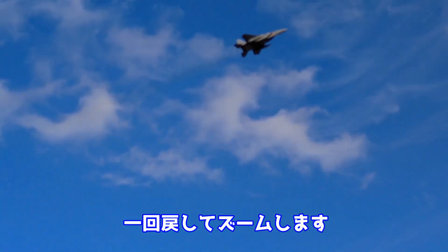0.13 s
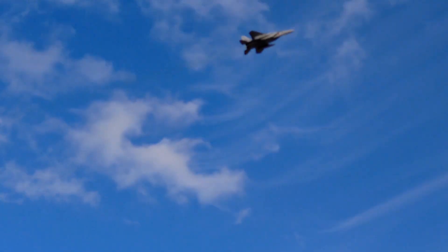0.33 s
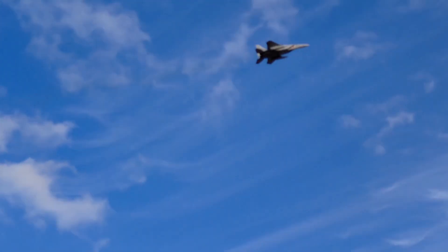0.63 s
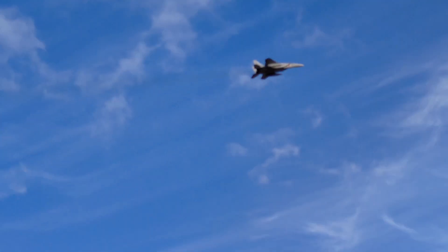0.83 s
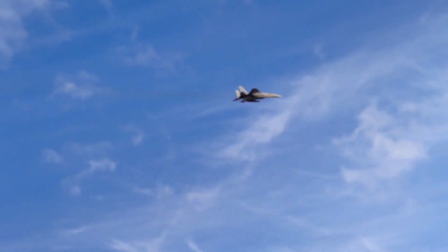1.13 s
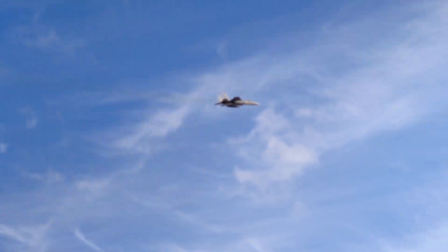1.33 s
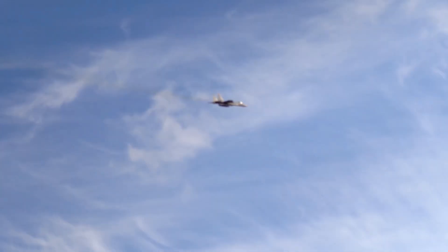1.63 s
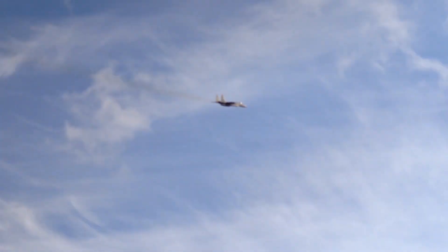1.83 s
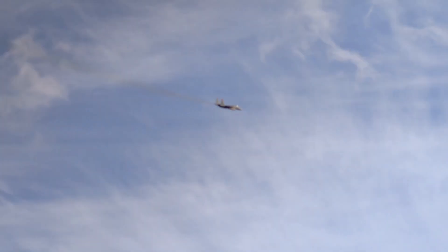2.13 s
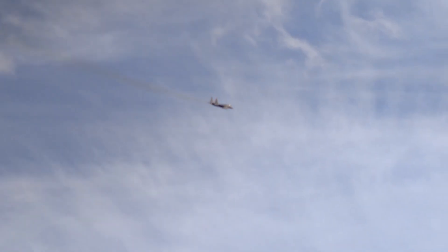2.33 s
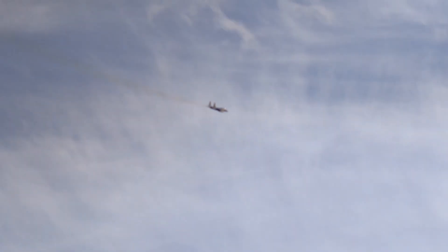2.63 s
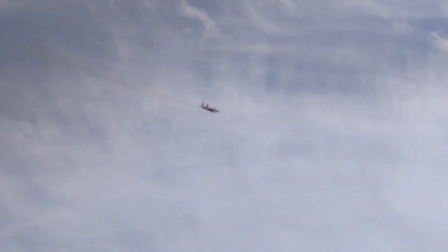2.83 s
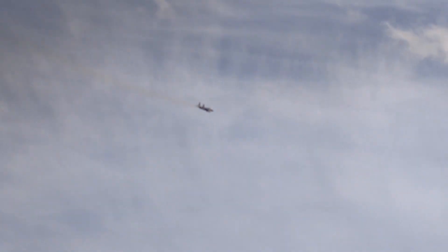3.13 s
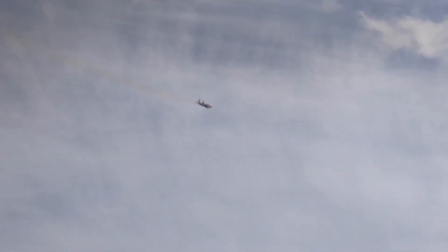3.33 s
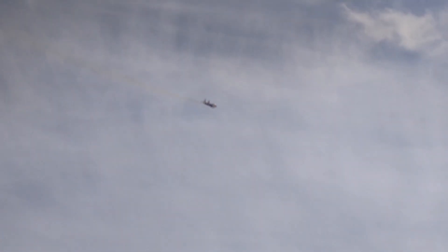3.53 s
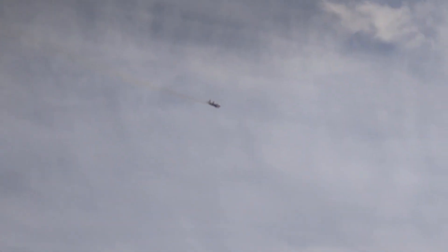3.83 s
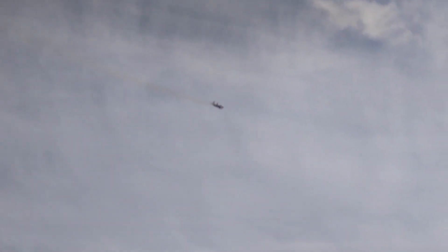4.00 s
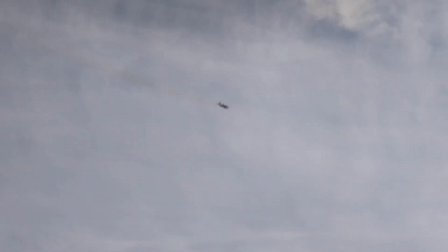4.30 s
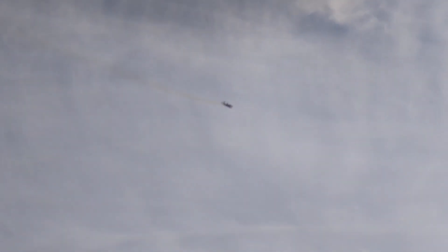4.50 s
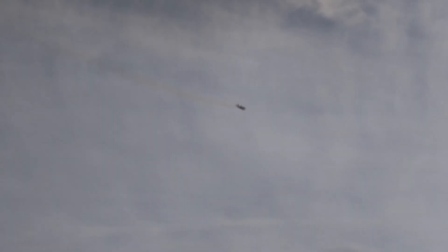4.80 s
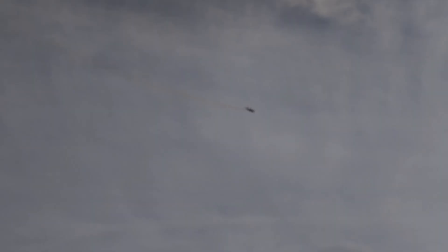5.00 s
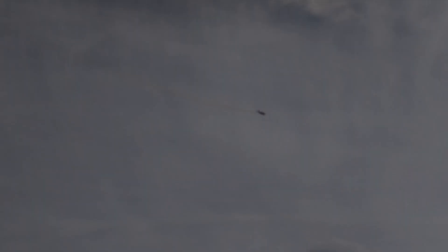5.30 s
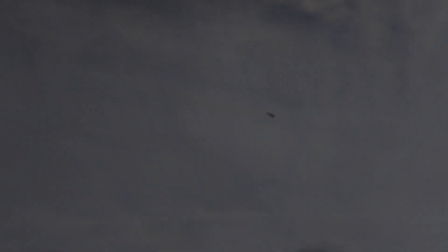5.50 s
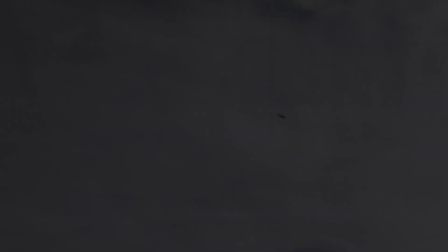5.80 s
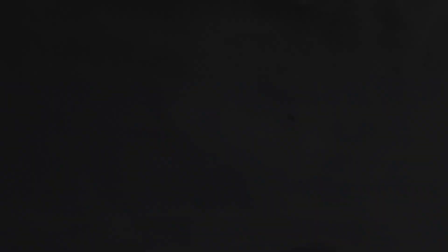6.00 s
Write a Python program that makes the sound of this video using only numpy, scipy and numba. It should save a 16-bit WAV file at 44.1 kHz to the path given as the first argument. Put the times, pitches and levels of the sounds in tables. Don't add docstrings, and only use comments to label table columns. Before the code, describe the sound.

A military jet tears past overhead with a rough, crackling howl that peaks early, then recedes into deep, fluttering rumble as it climbs away.

```python
import sys
import numpy as np
from scipy import signal
from scipy.fft import rfft, irfft, next_fast_len
from scipy.io import wavfile
from scipy.ndimage import uniform_filter1d, map_coordinates
from numba import njit

SR = 44100
rng = np.random.default_rng(int(sys.argv[2]) if len(sys.argv) > 2 else 0)


def convert_level_to_amplitude(level_db):
    exponent = np.asarray(level_db, float) / 20
    return 10 ** exponent


def materialize(psi):
    bounded = np.clip(np.atleast_2d(psi).T, -1, 1)
    quanta = np.round(bounded * 32767).astype(np.int16)
    wavfile.write(sys.argv[1], SR, quanta)


N = 271215


def noise():
    return rng.standard_normal(N)


def unit(x):
    return x / np.sqrt(np.mean(x ** 2))


def curves(table):
    s, *columns = np.transpose(table)
    return [np.interp(np.arange(N) / SR, s, c) for c in columns]


def bumps(table):
    t = np.arange(N) / SR
    return sum(db * np.exp(-((t - s) / half) ** 2) for s, db, half in table)


def colour(x, hz, db):
    size = next_fast_len(N)
    f = np.maximum(np.arange(size // 2 + 1) * SR / size, 1)
    gain = convert_level_to_amplitude(np.interp(np.log(f), np.log(hz), db, left=-90, right=-90))
    return irfft(rfft(x, size) * gain, size)[:N]


def band_noise(table):
    return unit(colour(noise(), *np.transpose(table)))


def delay(x, ms):
    return map_coordinates(x, [np.arange(N) - ms * SR / 1000], order=3, mode="nearest")


def walk(rate):
    k = int(SR / rate)
    steps = np.repeat(rng.standard_normal(N // k + 1), k)
    return unit(uniform_filter1d(uniform_filter1d(steps, k), k)[:N])


def ports(make, apart, lead_ms):
    shared, apart = make(), np.clip(apart, 0, 1)
    pair = [np.sqrt(1 - apart) * shared + np.sqrt(apart) * make() for _ in range(2)]
    return np.array([delay(pair[0], -lead_ms / 2), delay(pair[1], lead_ms / 2)])


def lift(pair, hz, kind, db):
    part = signal.sosfiltfilt(signal.butter(2, hz, kind, fs=SR, output="sos"), pair)
    return pair + (convert_level_to_amplitude(db) - 1) * part


def turbulence(pair, patchy_db=2.0):
    z = signal.stft(pair, nperseg=2048)[2]
    field = rng.standard_normal(z.shape[1:])
    field = uniform_filter1d(uniform_filter1d(field, size=3, axis=0), size=3, axis=1)
    gain = convert_level_to_amplitude(patchy_db * np.clip(unit(field), -2, 2))
    return signal.istft(z * unit(gain), nperseg=2048)[1][:, :N]


@njit
def svf(x, hz, width):
    y, b, l = np.empty(len(x)), 0., 0.
    for i in range(len(x)):
        g, k = np.tan(np.pi * hz[i] / SR), width[i] / hz[i]
        v = (b + g * (x[i] - l)) / (1 + g * (g + k))
        b, l, y[i] = 2 * v - b, l + 2 * g * v, k * v
    return y


def howl(hz, wide):
    air = noise()
    core = svf(svf(air, hz, wide), hz, wide)
    skirt_hz, skirt_wide = 1.3 * hz, 1.8 * wide
    skirt = svf(svf(air, skirt_hz, skirt_wide), skirt_hz, skirt_wide)
    return (core + convert_level_to_amplitude(-14.5) * skirt) / np.sqrt(wide / SR * np.pi / 2)


def roar(howl_hz, width_hz, lead_ms, level_db):
    # frequency in Hz, level in dB per Hz.
    broad = [(230, -19), (330, -6.5), (450, -3), (600, -1.5), (800, -16.5)]
    hz = howl_hz * (1 + .04 * walk(12))
    broad_db = -6 + 8.5 * np.log2(width_hz / 400)
    pair = ports(lambda: howl(hz, 0.99 * width_hz), 0.013, lead_ms)
    pair += convert_level_to_amplitude(broad_db) * ports(lambda: band_noise(broad), 0.037, lead_ms)
    return pair * convert_level_to_amplitude(level_db + np.array([[-.3], [.8]]))


def rumble(lead_ms, behind, km, gust_db):
    # frequency in Hz, level in dB per Hz.
    deep = [(18, -15.5), (30, -29.5), (60, -10.5), (95, -4), (132, 0.5), (170, -2), (250, -4.5), (330, -9),
            (450, -11.5), (620, -22.5)]
    # frequency in Hz, level in dB per Hz.
    ground = [(90, -24), (120, -6), (138, -3.5), (165, -10), (210, -22.5)]
    # centre in seconds, level in dB, half length in seconds.
    rolls = [(0.13, 1, 0.045), (0.509, -4.5, 0.02), (0.718, -2, 0.22), (1.038, -2, 0.27), (1.327, 0, 0.04),
             (1.576, -1, 0.087), (1.856, 1, 0.044), (1.956, -2.5, 0.026), (2.534, 1, 0.079),
             (2.873, 2.5, 0.02), (3.283, -0.5, 0.055), (3.402, -2.5, 0.099), (3.532, 5, 0.035),
             (3.712, 0.5, 0.043), (4.081, -5, 0.075), (4.23, -0.5, 0.035), (3.17, 1.8, 0.08),
             (2.68, -1.5, 0.091), (5.85, 0.5, 0.049), (0.82, -1, 0.05), (2.25, 1.5, 0.14),
             (4.749, -1.5, 0.062), (5.358, 5.5, 0.052), (5.687, 2.5, 0.14), (5.986, 7.5, 0.12)]
    # centre in seconds, level in dB, half length in seconds.
    ground_swings = [
        (2.6, -3, 0.36),
        (3.2, -3.5, .2),
        (3.6, 0.5, .1),
        (4.2, 2, .08),
        (4.6, -1, 0.18),
        (5.0, 2, .1),
        (5.4, 2, 0.11),
        (5.75, 0.5, .12),
        (6.0, -1, .1),
    ]
    pair = ports(lambda: band_noise(deep), 0.0087, lead_ms)
    pair = lift(pair, 69, "low", -2.5 + 4 * behind + gust_db)
    pair = lift(pair, 200, "high", 6 - 7 * km)
    boom_db = -19 + 12.5 * km + bumps(ground_swings)
    pair += convert_level_to_amplitude(boom_db) * band_noise(ground)
    return pair * convert_level_to_amplitude(-38 + 24 * behind + 0.98 * bumps(rolls))


def rasp(lead_ms, level_db):
    # frequency in Hz, level in dB per Hz.
    small_eddies = [(500, -8), (800, -1.5), (1050, 2), (1350, 4), (1500, -3.5), (1700, -8), (2000, -11),
                    (2300, -53)]
    pair = ports(lambda: band_noise(small_eddies), 0.047, 1.34 * lead_ms)
    return pair * convert_level_to_amplitude(level_db + np.array([[.1], [2.5]]))


def steepen(low):
    bend = 0.22 * np.tanh(2 * low) ** 2
    return low + signal.sosfiltfilt(signal.butter(3, [40, 1500], "band", fs=SR, output="sos"), bend)


def scatter(pair, share, tail_ms):
    keep = np.exp(-1000 / (tail_ms * SR))
    tail = signal.lfilter([0, share * np.sqrt(1 - keep ** 2)], [1, -keep], np.abs(pair))
    return pair + tail * rng.standard_normal(pair.shape)


def lone_fronts(lead_ms):
    # arrival in seconds, peak in dB.
    single_fronts = [(0.0337, -29), (0.1261, -8.5), (0.2042, -18), (0.2302, -17.5), (0.291, -15),
                     (0.3646, -19), (0.382, -16.5), (0.4032, -21), (0.453, -14.5), (0.4786, -7.5),
                     (0.5651, -24), (0.5975, -15.5), (0.615, -3.5), (0.6673, -12), (0.7213, -14),
                     (0.7996, -10.5), (1.0001, -20.5), (1.0535, -11.5), (1.1388, -9), (1.2472, -19.5),
                     (1.258, -13), (1.3296, -8.5), (1.4635, -10.5), (1.497, -7.5), (1.5363, -15.5),
                     (1.5542, -3), (1.6802, -17.5), (1.6818, -4.5), (1.8137, -18.5), (2.01, -22.5),
                     (2.1358, -16.5), (2.2513, -12.5), (2.4727, -22), (2.5112, -27), (2.6957, -16.5),
                     (2.947, -26), (3.105, -25.5), (3.149, -22.5), (3.188, -26.5), (3.2, -34.5),
                     (3.2018, -13), (3.26, -27), (3.3282, -25), (3.3852, -12), (3.471, -24.5),
                     (3.7632, -29.5), (3.7745, -27.5), (3.818, -25), (3.8506, -11.5), (3.8761, -21.5),
                     (3.8968, -27), (3.9623, -22), (4.0163, -18), (4.0405, -17.5), (4.2348, -34),
                     (4.4383, -21.5), (4.813, -24), (4.984, -25), (5.0825, -28.5), (5.2455, -43)]
    # arrival in seconds, peak in dB.
    further_fronts = [(0.4035, -19.5), (0.502, -12), (0.8114, -16), (0.9224, -16), (1.0727, -12.5),
                      (1.5694, -17), (1.9347, -16.5), (1.9662, -6.5), (2.0292, -6.5), (2.0348, -9.5),
                      (2.0901, -13), (2.2634, -11), (2.2744, -12), (2.2894, -25.5), (2.3394, -15.5),
                      (2.351, -14), (2.3692, -15.5), (2.3812, -15.5), (2.4144, -15.5), (2.4714, -23),
                      (2.5348, -26.5), (2.6586, -24.5), (2.9051, -16.5), (3.701, -30), (3.9294, -21.5),
                      (4.0556, -29.5), (4.0654, -22), (4.0757, -30.5), (4.1869, -39), (4.2822, -30),
                      (4.3705, -39), (4.3986, -27.5), (4.4144, -31.5), (4.4257, -24), (4.625, -31.5),
                      (4.7704, -35), (4.8906, -33.5), (5.018, -33.5), (5.0228, -25), (5.3438, -36),
                      (5.519, -30), (5.5677, -34.5), (5.618, -37), (5.8616, -38.5), (6.0033, -41)]
    lone = np.zeros(N)
    s, peak_db = np.transpose(list(single_fronts) + list(further_fronts))
    lone[((s + .001) * SR).astype(int)] = convert_level_to_amplitude(peak_db + 11.0)
    return lift(scatter(ports(lambda: lone, 0, lead_ms), 0.32, 3.5), 3900, "low", -6.0)


def approach_colour(pair):
    # frequency in Hz, left level in dB, right level in dB.
    coming_on = [(1000, 2.5, -0.5), (2180, 0.5, 1), (3100, 7.5, -3), (3930, -4.5, 0.5), (4800, -7, -2.5),
                 (5540, -2.5, -4.5), (6460, 3, 8), (7200, -1.5, -2), (9400, 2.5, -4)]
    ahead = np.clip(3.6 * (1 - np.arange(N) / SR / 1.1), 0, 1)
    hz, *dbs = np.transpose(coming_on)
    return (1 - ahead) * pair + ahead * np.array([colour(pair[c], hz, dbs[c]) for c in range(2)])


def port_colour(pair, behind):
    # frequency in Hz, left and right level in dB with the jet abeam,
    # left and right level in dB with the jet going away.
    response = [(1632, -2.5, -13, -1.5, -43), (2296, -2, 1.5, 9, -26.5), (2720, -7, -7.5, -0.5, 4.5),
                (3280, -10.5, 5.5, 3.5, 9.5), (3774, 0, 3, 7, -0.5), (4050, -1.5, -2.5, 1, -15),
                (5190, 6, 1, -1, -2), (5400, 1.5, 6, -6.5, -2.5), (6640, 1, -5.5, -4, -1.5),
                (6890, 5, -2, -1, -12), (7405, -16, 0, -8.5, -34.5), (7980, -15.5, -17.5, -29.5, -31),
                (8300, -38, -38.5, -40, -41), (8450, -15, -17.5, -21.5, -23.5)]
    hz, *dbs = np.transpose(response)
    hz = np.r_[1250, hz, 9080]
    dbs = [np.r_[db[0] - 18.0, db, db[-1] - 9.0] + 6.5 for db in dbs]
    abeam = np.array([colour(pair[c], hz, dbs[c]) for c in range(2)])
    away = np.array([colour(pair[c], hz, dbs[2 + c]) for c in range(2)])
    return (1 - behind) * abeam + behind * away


def crackle(wave, lead_ms, turn, behind, flutter_db, level_db, bright_db, sharp_db):
    # centre in seconds, level in dB, half length in seconds.
    dulled = [(.1, -1.5, 0.064), (.42, 0, .05), (.62, 0.5, .04), (1.0, 0, .1), (2.3, -0.5, 0.068),
              (2.6, 0, .1), (3.0, 0.5, .1), (3.3, 1.5, .08), (3.85, -3, .08), (4.05, -1, .04),
              (4.16, 2, .04), (4.26, 5.5, .05), (4.38, 4.5, .03), (4.5, 0.5, .05), (4.75, 1, .08),
              (5.05, 5, .06), (5.3, 2, .08), (5.6, -0.5, .06), (5.85, -3, .1), (6.05, -0.5, .05)]
    wave = wave / np.sqrt(uniform_filter1d(wave ** 2, size=4096))
    crest = convert_level_to_amplitude(4.7 * np.clip(delay(wave, -0.26), -3, 2.4) + walk(45) + flutter_db)
    fronts = rng.random(N) < 1100 / SR
    fronts = fronts * convert_level_to_amplitude(np.minimum(3.6 * rng.exponential(size=N), 13))
    dense = convert_level_to_amplitude(-5.0) * noise() + convert_level_to_amplitude(-6.5 + 0.5 * sharp_db) * unit(fronts - fronts.mean())
    pair = ports(noise, 0.88, 0) * convert_level_to_amplitude(-7.5) + ports(lambda: dense, 0, lead_ms)
    pair = turbulence(pair * unit(crest) * convert_level_to_amplitude(level_db + 4.0), patchy_db=3.0)
    pair = approach_colour(pair + lone_fronts(lead_ms))
    pair = lift(pair, 3900, "low", bumps(dulled))
    pair = lift(pair, 6800, "high", bright_db)
    pair[1] = np.real(signal.hilbert(pair[1], next_fast_len(N))[:N] * np.exp(1j * turn))
    return port_colour(pair, behind)


def wind(gust_db):
    # frequency in Hz, level in dB per Hz.
    buffeting = [(12, -3.5), (25, -15.5), (40, 15.5), (70, -35)]
    return convert_level_to_amplitude(-55.0 + gust_db) * np.array([band_noise(buffeting) for _ in range(2)])


def gulps(usual_db):
    # jump in seconds, peak in dB.
    sudden = [(0.326, -11), (0.367, -8), (0.388, -9.5), (0.579, 0), (0.637, -13), (0.714, -11.5),
              (0.843, -4), (0.999, -12.5), (1.05, -9), (1.201, -10.5), (1.697, -13.5), (2.268, -12),
              (2.504, -7), (2.824, -15.5), (2.855, -16.5), (2.984, -11.5), (3.184, -16), (3.444, -18),
              (3.508, -12.5), (3.526, -18.5), (3.558, -19.5), (3.576, -14.5), (3.61, -15), (3.631, -14),
              (3.699, -11.5), (3.877, -11), (3.912, -11), (3.931, -13.5), (4.016, -12), (4.049, -16),
              (4.099, -11.5), (4.15, -14.5), (4.234, -9), (4.362, -9), (4.543, -6.5), (4.571, -8.5),
              (4.71, -17.5), (4.736, -15.5), (4.873, -6.5), (4.908, -12.5), (5.007, -10.5), (5.336, -8.5),
              (5.472, -10), (5.518, -12), (5.906, -15.5)]
    t = np.arange(N) / SR
    out = np.zeros(N)
    for s, peak_db in sudden:
        a, i, b = max(int((s - .05) * SR), 0), int(s * SR), int((s + .1) * SR)
        out[a:i] += -7 * np.exp((t[a:i] - s) / 0.0045)
        out[i:b] += (peak_db - 8.5 - usual_db[i]) * np.exp((s - t[i:b]) / 0.016)
    return uniform_filter1d(out, size=64)


def focusing():
    # centre in seconds, level in dB, half length in seconds.
    surges = [(0.05, -3, 0.033), (0.344, -3, 0.022), (0.351, -10, 0.0045), (0.505, 1.5, 0.0065),
              (0.454, 3.5, 0.074), (0.544, -5, 0.015), (0.619, 4, 0.022), (0.703, -4.5, 0.055),
              (0.973, -3.5, 0.015), (1.187, -6.5, 0.034), (1.442, 4, 0.14), (1.691, 6.5, 0.024),
              (1.926, 3, 0.084), (2.295, 1.5, 0.07), (2.434, -7, 0.027), (2.624, -9, 0.028),
              (2.704, 5, 0.018), (2.764, -4.5, 0.03), (3.28, 1, 0.036), (5.17, -1, 0.03), (2.948, 5, 0.055),
              (3.043, -2, 0.045), (3.208, 10, 0.024), (3.342, 8, 0.036), (3.557, -4, 0.14),
              (3.961, 7.5, 0.16), (4.141, -5.5, 0.037), (4.34, -1.5, 0.012), (5.054, 4, 0.041),
              (5.193, -6.5, 0.059), (5.562, 8.5, 0.064), (5.722, -3, 0.032), (5.981, 4.5, 0.031),
              (6.101, -22, 0.051)]
    # centre in seconds, level in dB.
    volleys = [(0.138, 4), (0.238, 4.5), (0.388, 2), (0.482, 0), (0.41, 4), (0.455, 3.5), (0.598, 6),
               (0.627, 3.5), (0.725, -1), (0.812, 7), (2.26, 0.5), (2.7, 1.5), (4.06, 3.5), (4.078, 4),
               (4.4, -1), (5.02, 4), (5.045, 2.5), (0.923, 6.5), (1.003, 0.5), (1.074, 0.5), (1.142, 2.5),
               (1.255, 4.5), (1.503, 6), (1.556, 8.5), (1.865, 5.5), (2.037, 5.5), (2.36, 6), (3.119, 8),
               (3.392, 2), (3.478, -0.5), (3.582, 6), (3.776, 7), (3.821, 3.5), (3.85, 1.5), (4.038, 5),
               (4.294, 5.5), (4.435, 5.5), (4.571, 2), (4.624, 7), (5.087, 9.5), (5.249, 7.5),
               (5.872, 11.5)]
    return bumps(surges) + bumps([(s, db, 0.011) for s, db in volleys])


def scene():
    # time in seconds, howl frequency in Hz, howl width in Hz, howl level in dB,
    # share seen from behind from 0 to 1, air path in km.
    flight = [(0, 453, 179, -18, 0.32, 0.49), (.15, 453, 215.6, -20.5, 0.19, 0.53),
              (.6, 534, 187, -18, 0.14, 0.42), (1, 611, 219, -21, 0.14, 0.43),
              (1.3, 672, 345, -20.5, 0.44, 0.24), (1.55, 813, 445, -19.5, 0.26, 0.39),
              (1.8, 836, 745, -26, 0.45, 0.19), (2.1, 678, 616, -27, 0.53, 0.27),
              (2.4, 520, 578, -24.5, 0.68, 0.41), (2.8, 512, 470, -24, 0.79, 0.62),
              (3.2, 490, 428, -22, 0.88, 0.9), (3.6, 456, 395, -23, 0.89, 0.89),
              (3.95, 482, 404, -19, 0.94, 1.27), (4.3, 479, 392, -20.5, 0.92, 1.18),
              (4.8, 463, 401, -21.5, 0.76, 1.22), (5.3, 473, 426, -21.5, 0.98, 1.28),
              (5.7, 474, 423, -26, 0.98, 1.46), (6.15, 525, 406, -30, 0.74, 1.34)]
    # time in seconds, left lead of the roar in ms, left lead of the crackle in ms,
    # phase turn of the crackle round the housing in radians.
    bearing = [
        (0, 0.22, 0.56, 8),
        (.6, 0.28, 0.43, 4.5),
        (1.2, 0.29, 0.39, 13),
        (1.75, 0.21, 0.23, 6.5),
        (2.2, 0.17, -0.067, -1),
        (2.75, 0.19, -0.016, 1),
        (3.5, 0.16, -0.16, -1.5),
        (4.5, 0.082, -0.15, -0.5),
        (6.15, 0.077, -0.1, 0),
    ]
    # centre in seconds, level in dB, half length in seconds.
    swells = [(0.14, 3, 0.068), (0.35, -13, 0.004), (0.399, 6.5, 0.019), (0.539, -4.5, 0.015),
              (0.698, -4, 0.042), (0.848, 3, 0.05), (0.978, -4.5, 0.019), (1.157, -3.5, 0.089),
              (1.377, 1, 0.12), (1.47, -1.5, 0.06), (1.626, -5, 0.11), (1.836, 2.5, 0.024),
              (2.015, 0, 0.07), (2.19, 0.4, 0.041), (2.315, 3, 0.057), (2.46, 0, 0.03), (0.5, -0.5, 0.029),
              (2.794, -4.5, 0.022), (3.273, -4, 0.027), (3.422, -4.5, 0.034), (3.662, 2, 0.038),
              (3.821, -5, 0.06), (3.921, -2.5, 0.04), (4.111, -7.5, 0.067), (4.33, -7, 0.019),
              (4.44, 1.5, 0.092), (4.689, -3, 0.064), (5.36, 2.5, 0.08), (5.587, 6, 0.096),
              (5.767, -0.5, 0.02), (5.907, 5.5, 0.15), (6.076, 0, 0.069)]
    # centre in seconds, level in dB, half length in seconds.
    gusts = [
        (0.239, 9.5, 0.11),
        (0.659, -10.5, 0.082),
        (1.058, -10, 0.047),
        (1.437, 5.5, 0.16),
        (2.035, 4, 0.084),
        (3.033, 3.5, 0.15),
        (4.53, -1, 0.11),
        (4.889, 8.5, 0.17),
    ]
    # centre in seconds, level in dB, half length in seconds.
    right_lean = [
        (1.0, 1.0, .5),
        (4.3, 0.2, .5),
    ]
    howl_hz, width_hz, howl_db, behind, km = curves(flight)
    low_ms, high_ms, turn = curves(bearing)
    flutter_db, surge_db = walk(30), focusing()
    swell_db, gust_db = 1.1 * bumps(swells), 1.5 * bumps(gusts)
    grain_db = np.roll(flutter_db[::-1], N // 3)[np.arange(N) * 2 % N]
    gulp_db = gulps(howl_db + swell_db)

    roar_db = howl_db + swell_db + gulp_db + .6 * grain_db + 0.26 * flutter_db
    rasp_db = -22 - 8.5 * km + 0.53 * surge_db + 0.45 * swell_db + 0.43 * gulp_db + 1.86 * flutter_db
    low = roar(howl_hz, width_hz, low_ms, roar_db)
    low += rumble(low_ms, behind, km, gust_db)
    low += rasp(low_ms, rasp_db)
    low = turbulence(low)
    lean_db = bumps(right_lean) * np.array([[-.5], [.5]])
    low = steepen(low * convert_level_to_amplitude(0.27 * grain_db + 0.2 * gulp_db + lean_db))

    level_db = -23.5 - 17 * km + 0.69 * surge_db
    bright_db = -1 + 7 * behind - 8.5 * km + 0.94 * surge_db
    away = np.clip(1.06 * behind, 0, 1)
    high = crackle(low[1], high_ms, turn, away, flutter_db, level_db, bright_db, surge_db)
    return low + high + wind(gust_db)


@njit
def limiter(x, top, attack, release):
    y, e = np.empty_like(x), 0.
    for i in range(x.shape[1]):
        p = max(abs(x[0, i]), abs(x[1, i]))
        e += (p - e) * (attack if p > e else release)
        y[:, i] = x[:, i] * min(1., top / (e + 1e-9))
    return y


def low_pass(x):
    return signal.sosfilt(signal.butter(12, 9310, fs=SR, output="sos"), x)


def record(dry):
    # centre in seconds, share cancelled from 0 to 1, half length in seconds.
    out_of_step = [
        (.505, 1.2, .02),
        (.64, 1.1, .03),
        (.735, 1.2, .025),
        (.84, 1.1, .04),
        (.93, .8, .03),
        (1.07, 1.4, .03),
        (1.25, 0.3, .05),
    ]
    held = limiter(dry, 0.35, 0.012, 0.0013)
    held = 0.55 * 1.203 * np.tanh(held / (0.55 * 1.262))
    held = signal.sosfilt(signal.butter(1, 12, "high", fs=SR, output="sos"), held)
    cavity = signal.filtfilt(*signal.iirpeak(2217, 2217 / 676, fs=SR), held)
    clash_band = signal.butter(2, [2595, 2795], "band", fs=SR, output="sos")
    clash = signal.sosfiltfilt(clash_band, held.mean(axis=0))
    held = held - np.clip(bumps(out_of_step), 0, 1) * clash
    return low_pass(held - 0.74 * cavity)


dry = scene()
out = record(dry)
materialize(out)
```